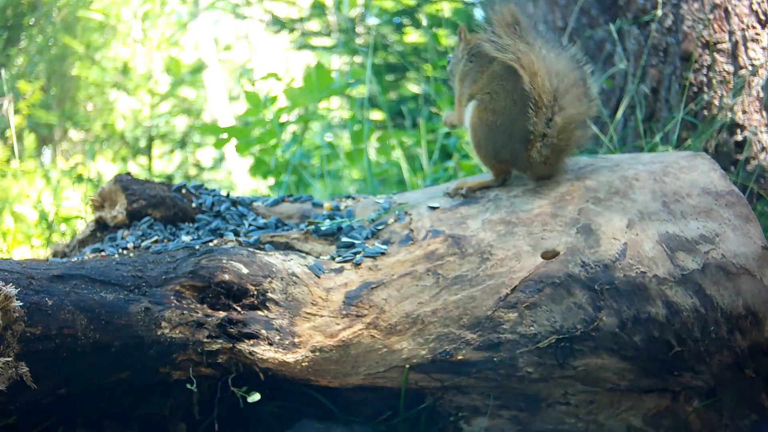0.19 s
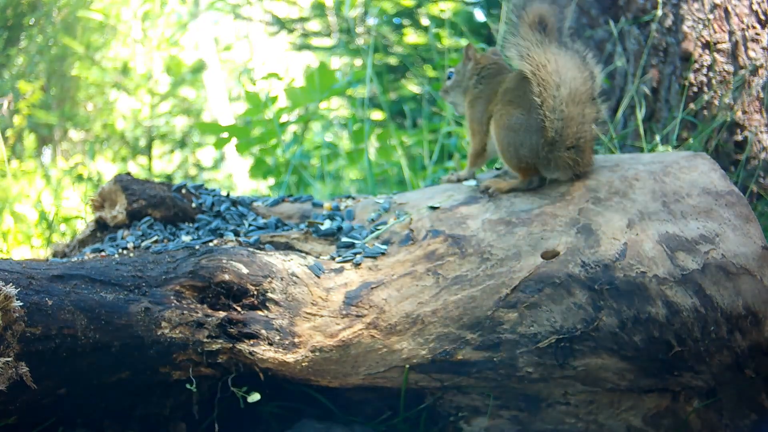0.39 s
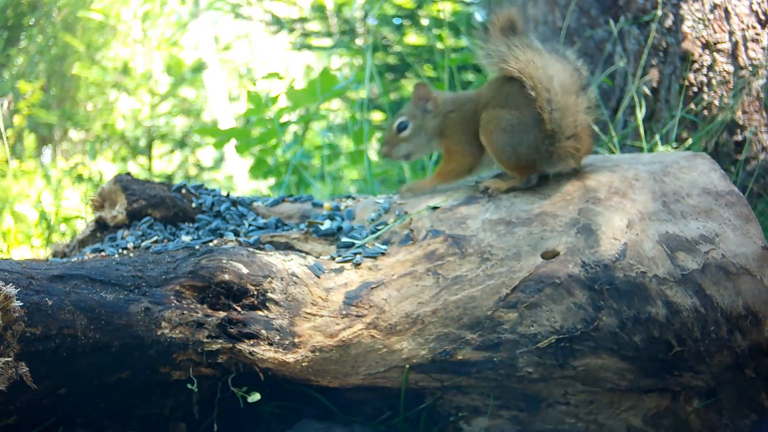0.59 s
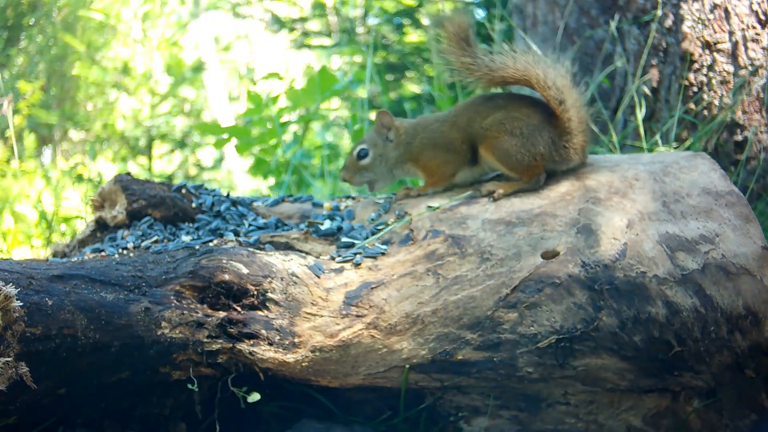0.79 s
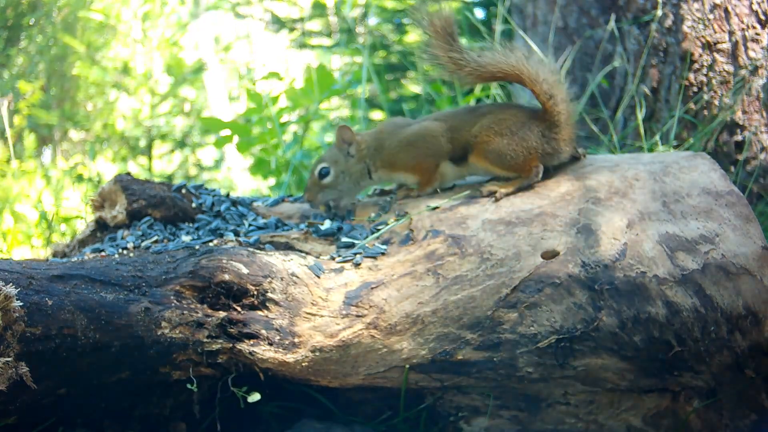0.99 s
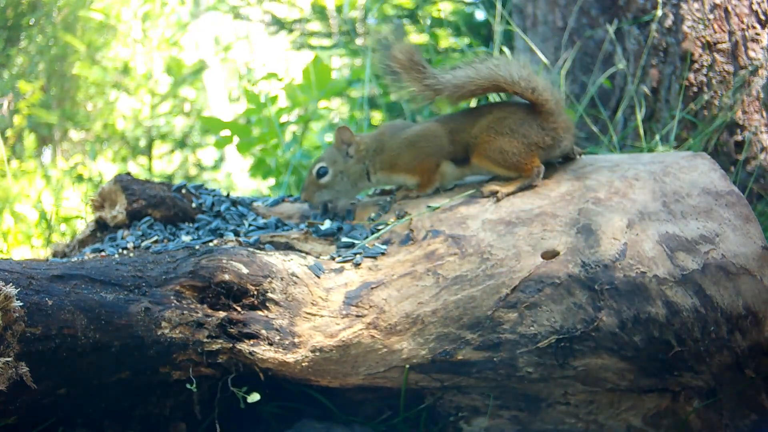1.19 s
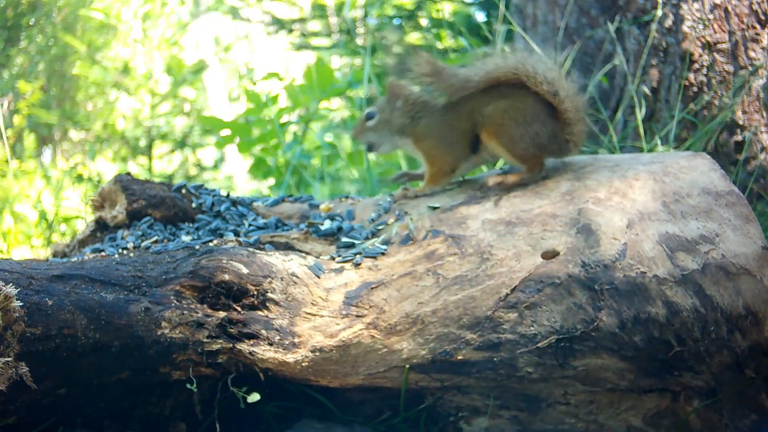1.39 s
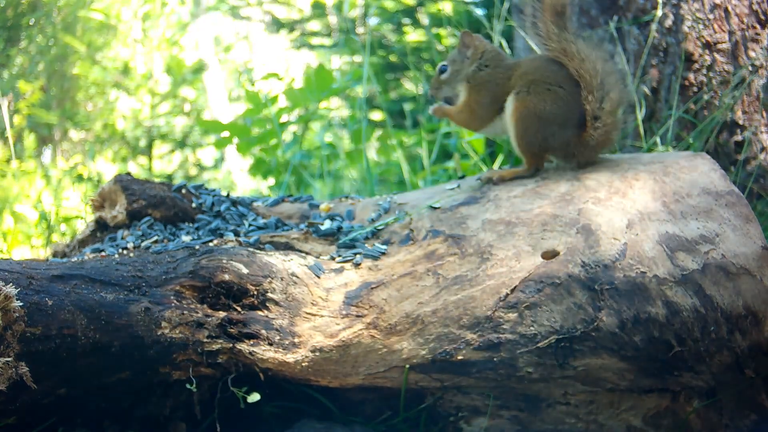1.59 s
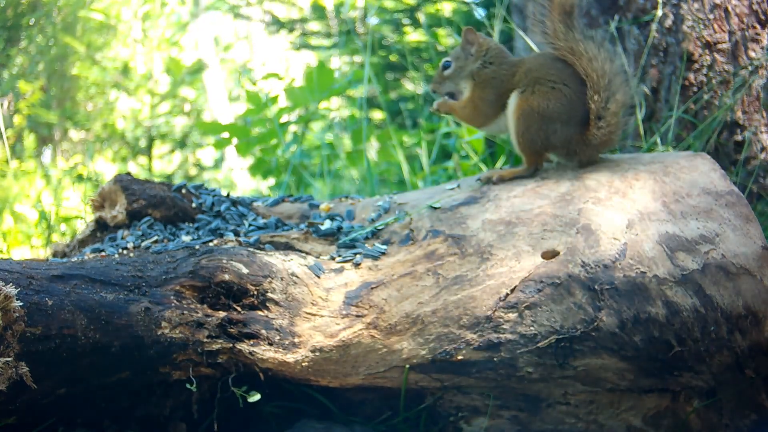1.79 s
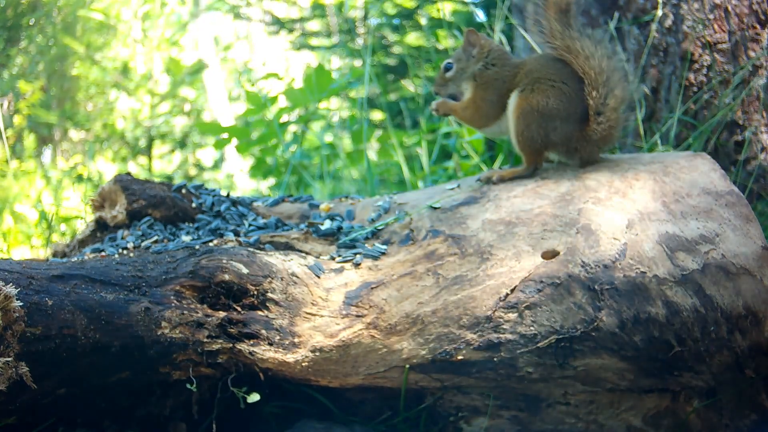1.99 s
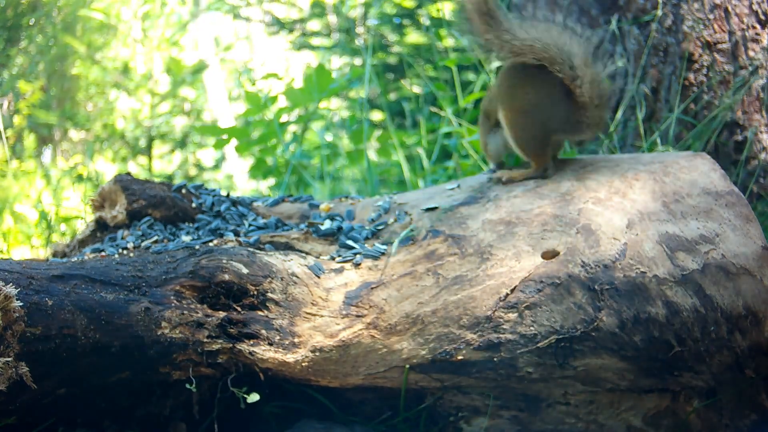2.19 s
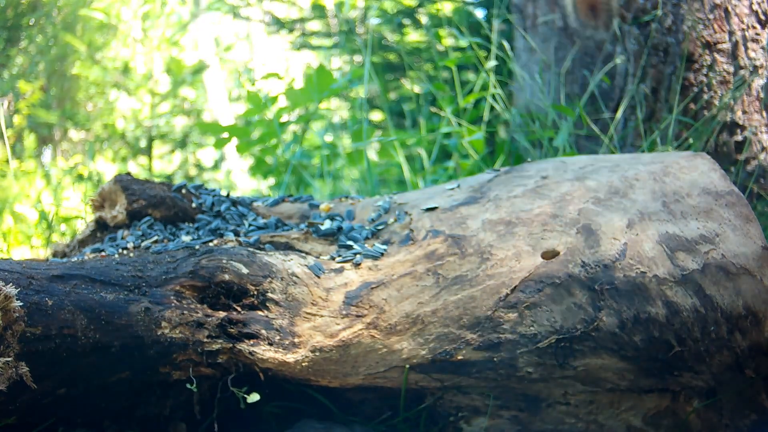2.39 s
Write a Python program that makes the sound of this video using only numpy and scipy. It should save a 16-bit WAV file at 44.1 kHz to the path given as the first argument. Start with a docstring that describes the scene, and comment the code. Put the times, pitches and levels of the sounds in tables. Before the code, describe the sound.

A crow close to the microphone gives one clear nasal caw, two harsh fluttering caws and the clipped start of a fourth; a young crow begs thinly further off, over a soft hush with slight tree echo.

```python
"""A crow close to the microphone in a wooded backyard: one clear nasal caw, two harsh fluttering ones, a fourth begun.
Each caw is a train of paired syrinx pulses and air noise, coloured by a throat with a moving resonance.
Further off a young crow begs in thin, hoarse-edged cries and a small bird chirps in gliding whistles.
A squirrel's claws scratch a log as short noise bursts, over a steady hush of air noise.
The trees return a soft echo of the birds; the loudest peaks flatten and crackle in the microphone."""
import sys
import numpy as np
from scipy import signal
from scipy.fft import rfft, irfft, next_fast_len
from scipy.io import wavfile
from scipy.ndimage import uniform_filter1d

SR = 44100
rng = np.random.default_rng(int(sys.argv[2]) if len(sys.argv) > 2 else 0)


def store_pcm(level_fs):
    """Save levels as 16-bit WAV."""
    pcm = np.round(np.clip(level_fs, -1, 1) * 32767).astype(np.int16)
    wavfile.write(sys.argv[1], SR, np.atleast_2d(pcm).T)


N = 112455
TIME = np.arange(N) / SR  # s
CUTOFF_HZ = 15800  # top of the voices and of the microphone
EDGE_S = 0.0034  # a voice starts and stops this fast


def from_db(db):
    """Decibels to gain."""
    return 10 ** (np.asarray(db) / 20)


def rms_one(x):
    """Scale to unit power."""
    return x / np.sqrt(np.mean(x ** 2) + 1e-20)


def in_time(rows):
    """Each column of a curve, interpolated at every sample."""
    time_s, *columns = np.transpose(rows)
    return [np.interp(TIME, time_s, column) for column in columns]


def gate(rows):
    """Open from a curve's first point to its last, with short sloping edges."""
    inside_s = np.minimum(TIME - rows[0][0], rows[-1][0] - TIME)
    return np.clip(inside_s / EDGE_S + .5, 0, 1)


def drift(hz):
    """Random wander of spread 1: noise lowpassed around the given rate."""
    r = np.exp(-2 * np.pi * hz / SR)
    wander = signal.lfilter([1], [1, -2 * r, r * r], rng.standard_normal(2 * N))
    return rms_one(wander[N:])  # the first half lets the filter settle


def oscillate(hz):
    """Sine following a moving frequency."""
    return np.sin(2 * np.pi * np.cumsum(hz) / SR)


def colour(x, points):
    """Causal (minimum-phase) filter through (freq_hz, gain_db) points."""
    size = 2 * next_fast_len(N)
    hz, db = np.transpose(points)
    grid_hz = np.maximum(np.arange(size // 2 + 1) * SR / size, 1)
    gain_db = np.interp(np.log(grid_hz), np.log(hz), db)
    cepstrum = irfft(np.log(from_db(gain_db)))
    # fold the cepstrum forward in time: this makes the filter minimum-phase
    cepstrum[1:size // 2] *= 2
    cepstrum[size // 2 + 1:] = 0
    return irfft(rfft(x, size) * np.exp(rfft(cepstrum)))[:N]


def highpass(x, order, hz):
    """Remove what lies below a frequency."""
    return signal.sosfilt(signal.butter(order, hz, "high", fs=SR, output="sos"), x)


def even(x):
    """Hold the level near 1, leaving the fast flutter."""
    size = SR // 50
    power = uniform_filter1d(uniform_filter1d(x * x, size), size)
    return x / np.sqrt(np.abs(power) + 1e-12)


def syrinx(pitch, active, jitter, hiss_db, centre_hz, boost_db, width_hz, second=0, limp=0, wander=0, wander_s=1):
    """One pulse a cycle, or a second one just off mid-cycle, under a moving resonance, with bright air noise."""
    phase = 2 * np.pi * np.cumsum(pitch * (1 + jitter * drift(150))) / SR
    on = uniform_filter1d(active, SR // 10) > 1e-6  # only compute around the call
    lead = np.exp(1j * (phase + np.pi * limp / 2))[on]
    lag = np.exp(1j * (phase + np.pi - np.pi * limp / 2))[on]
    pitch_on, centre_on, time_on = pitch[on], centre_hz[on], TIME[on]
    first_pulse, second_pulse, stack = 1, second, 0
    for harmonic in range(1, 64):
        first_pulse = first_pulse * lead
        second_pulse = second_pulse * lag
        hz = harmonic * pitch_on
        gain = 1 + from_db(boost_db) / (1 + 1j * (hz - centre_on) / width_hz)
        # the upper harmonics wander in level (real part) and phase (imaginary part)
        knots = rng.standard_normal(2000) + 2j * rng.standard_normal(2000)
        if harmonic > 8:
            gain = gain * np.exp(wander * np.interp(time_on / wander_s, np.arange(len(knots)), knots))
        stack = stack + ((first_pulse + second_pulse) * gain).real * (hz < CUTOFF_HZ)
    pulses = np.zeros(N)
    pulses[on] = stack
    hiss = highpass(rng.standard_normal(N), 2, 2300)
    puffs = 1 + np.cos(2 * phase if second else phase)  # air noise swells once per pulse
    return pulses + from_db(hiss_db) * hiss * puffs


def voiced(x, level_db, treble_db):
    """Give the body of a call its level, and the treble its level relative to the body."""
    body = signal.sosfiltfilt(signal.butter(6, 2450, fs=SR, output="sos"), x)
    return from_db(level_db) * (even(body) + from_db(treble_db) * even(x - body))


# Spectrum of the backyard hush: freq_hz, gain_db
AIR_SPECTRUM = [(25,-16),(90,-7),(260,-23),(480,-15),(1500,-5.5),(2400,-8),(4500,-23.5),(7100,-35.5),(15500,-50.5)]


def backyard_air():
    """Steady coloured noise, the hush of the place."""
    return from_db(-57.5) * rms_one(colour(rng.standard_normal(N), AIR_SPECTRUM))


# Colour of the echo from the trees: freq_hz, gain_db
ECHO_SPECTRUM = [(200,-9.5),(1500,-3),(4000,7),(15000,-6.5)]
ECHO_DB, ECHO_T60_S, ECHO_RISE_S = -18, 0.45, 0.013


def trees(x):
    """Diffuse echo from trunks and leaves: a decaying noise tail."""
    decay = from_db(-60 * TIME / ECHO_T60_S) * np.clip(TIME / ECHO_RISE_S, 0, 1)
    tail = rng.standard_normal(N) * decay
    echo = signal.fftconvolve(x, tail / np.linalg.norm(tail))[:N]
    return from_db(ECHO_DB) * colour(echo, ECHO_SPECTRUM)


# Claw strokes on the log: start_s, level_db (before the bark colours them)
CLAW_STROKES = [(2.477,-53),(2.488,-61),(2.5137,-53),(2.527,-50.5)]
# Colour of a scratch on bark: freq_hz, gain_db
BARK_SPECTRUM = [(300,-22),(2200,23),(4200,12.5),(6000,4),(15000,-7.5)]
CLAW_DECAY_S = 0.0028


def squirrel_claws():
    """Tiny scratches as the squirrel darts off: noise bursts that start at once and die away."""
    bursts = np.zeros(N)
    for start_s, level_db in CLAW_STROKES:
        bursts += from_db(level_db) * (TIME >= start_s) * np.exp(-np.abs(TIME - start_s) / CLAW_DECAY_S)
    return colour(bursts * rng.standard_normal(N), BARK_SPECTRUM)


# Small bird's whistles: start_s, length_s, start_hz, end_hz, level_db (peak)
BIRD_CHIRPS = [(2.452,.045,5200,3470,-60),(2.467,0.015,3000,4280,-64),(2.49,0.021,2590,2980,-51)]


def small_bird():
    """Short pure whistles that glide in pitch, swelling and fading."""
    out = np.zeros(N)
    for start_s, length_s, start_hz, end_hz, level_db in BIRD_CHIRPS:
        progress = np.clip((TIME - start_s) / length_s, 0, 1)
        whistle = oscillate(start_hz + (end_hz - start_hz) * progress)
        out += from_db(level_db) * np.sin(np.pi * progress) * whistle
    return out


# Young crow's begging cries, one curve each: time_s, pitch_hz, level_db, resonance_hz
BEG_CRIES = [
    [(.76,713,-71,1580),(.88,707,-47,1700),(.93,640,-48,2030),(.97,653,-64,1930)],
    [(.97,671,-48,1530),(1.005,689,-38.5,1400),(1.025,718.6,-32.5,1450),(1.047,696.5,-32,1410),(1.065,705,-36,1450)],
    [(2.3,708,-41.5,1430),(2.36,740,-55,1430),(2.43,730,-70,1400)],
]
# Young crow's throat as heard from further off: freq_hz, gain_db
YOUNG_THROAT = [(400,-28.5),(700,-14),(1450,-0.5),(2100,-5.5),(2900,-21.5),(3600,-10.5),(4500,-21.5),(5600,-22),(8000,-32),(15000,-63)]
HOARSE_EXTRA, HOARSE_S = 4.4, 0.018  # added jitter at the start, in multiples; how fast it clears


def begging_cry(rows):
    """A thin, high cry from further off, its pitch jittering most at the start."""
    pitch, level_db, centre_hz = in_time(rows)
    hoarse = 1 + HOARSE_EXTRA * np.exp(-np.abs(TIME - rows[0][0]) / HOARSE_S)
    source = syrinx(pitch, gate(rows), jitter=0.019 * hoarse, hiss_db=-11.0,
                    centre_hz=centre_hz, boost_db=21.5, width_hz=140)
    return gate(rows) * from_db(level_db) * even(colour(source, YOUNG_THROAT))


# Near crow's throat, shared by its openers and all its caws: freq_hz, gain_db
CROW_THROAT = [(280,-40.5),(450,-14.5),(620,-13),(750,-9.5),(950,-6.5),(1270,-0.5),(1450,1),(1700,3.5),(1900,-8),(2130,-7),(2350,-21),(2750,-18),(3020,-17.5),(3230,-11.5),(3850,-28.5),(4450,-21),(5200,-27),(5650,-34.5),(6700,-33),(7500,-40),(8500,-42),(9600,-58),(10800,-56.5),(15000,-65)]
# Lone syrinx pulses opening the first three caws: start_s, level_db (before the throat)
OPENING_PULSES = [(0.2138,5),(1.0606,8.5),(1.851,2.5)]


def openers():
    """Single pulses of the syrinx ring in the throat."""
    pulses = np.zeros(N)
    for start_s, level_db in OPENING_PULSES:
        pulses[int(start_s * SR)] = from_db(level_db)
    return colour(pulses, CROW_THROAT)


SECOND_PULSE = 0.77  # strength of the second pulse in each cycle, relative to the first

# Harsh caws, one curve each: time_s, pitch_hz, limp (second pulse off mid-cycle, in half cycles)
HARSH_PITCHES = [
    [(1.06,216.1,0.038),(1.085,254.8,0.086),(1.11,305.6,0.085),(1.14,314.6,0.077),(1.2,290,0.04),(1.25,278.6,.022),(1.31,272.2,0.048),(1.4,249.1,0.017),(1.5,233.7,0.03),(1.6,219.2,0.04),(1.655,169,0.097)],
    [(1.859,216.9,0.043),(1.88,267.9,0.065),(1.92,315.1,0.017),(1.945,317.8,0.031),(2.0,296.2,0.06),(2.1,278.9,0.095),(2.2,245.9,0.059),(2.26,223,0.075),(2.305,177,0.082)],
    [(2.543,211,0.075),(2.56,249,0.095)],
]
# Harsh caws, one curve each: time_s, level_db, resonance_hz, treble_db (relative to level)
HARSH_SHAPES = [
    [(1.064,-31,1420,-13.5),(1.073,-26.5,1390,-18),(1.082,-15,1420,-17.5),(1.14,-16.5,1365,-15),(1.21,-16.5,1720,-18.5),(1.32,-15,1596,-17.5),(1.40,-19,1700,-18.5),(1.52,-19.5,1420,-17.5),(1.615,-21,1345,-17),(1.65,-30.5,1450,-19)],
    [(1.86,-22.5,1275,-18.5),(1.88,-15.5,1540,-17.5),(1.94,-16,1450,-16.5),(2.03,-14.5,1710,-19),(2.11,-15.5,1600,-17.5),(2.16,-17.5,1570,-19),(2.265,-20.5,1400,-18),(2.302,-32,1370,-19)],
    [(2.544,-25,1400,-15),(2.56,-47,1400,-22)],
]
# the flutter follows the pitch, so it slows as the pitch sags
FLUTTER_PER_CYCLE, FLUTTER_UNREST = .215, .045  # unrest: random spread of its rate, as a fraction
FLUTTER_DEPTH, FLUTTER_DB = 0.057, 1.5  # pitch swing as a fraction; level swing
FLUTTER_FULL_DB, FLUTTER_FOLLOWS = -17, 1.17  # below this level it shrinks: dB of flutter per dB
CATCH_AT_S, CATCH_S, CATCH_DB = 1.9255, 0.0021, -8.5  # the voice catches briefly in the third caw


def harsh_caw(pitch_rows, shape_rows):
    """Pulse pairs limp unsteadily; at full effort the pitch flutters about sixty times a second."""
    pitch, limp = in_time(pitch_rows)
    level_db, centre_hz, treble_db = in_time(shape_rows)
    active = gate(shape_rows)
    effort = from_db(FLUTTER_FOLLOWS * np.minimum(level_db - FLUTTER_FULL_DB, 0))
    flutter_hz = FLUTTER_PER_CYCLE * pitch * (1 + FLUTTER_UNREST * drift(40)) * active
    flutter = effort * oscillate(flutter_hz)
    # the fast wander of the upper harmonics is heard as a rasp
    source = syrinx(pitch * (1 + FLUTTER_DEPTH * flutter), active, jitter=.009 * (2 - effort), hiss_db=0,
                    centre_hz=centre_hz, boost_db=4.5, width_hz=163, second=SECOND_PULSE,
                    limp=limp + .015 * drift(140), wander=.28, wander_s=.003)
    throaty = colour(source * from_db(FLUTTER_DB * flutter), CROW_THROAT)
    catch_db = CATCH_DB * np.exp(-((TIME - CATCH_AT_S) / CATCH_S) ** 2)
    return active * voiced(throaty, level_db + catch_db, treble_db)


# Clear caw's pitch: time_s, pitch_hz
CLEAR_PITCH_CURVE = [(.218,224),(.235,284.6),(.25,323.8),(.29,335.4),(.35,329.4),(.387,320.6),(.427,311.1),(.5,312.2),(.569,290.3),(.611,277.9),(.671,268.1),(.71,248.5),(.75,212.1)]
# Clear caw's loudness and throat: time_s, level_db, resonance_hz, treble_db (relative to level)
CLEAR_SHAPE_CURVE = [(.219,-30,1200,-13.5),(.234,-18,1370,-16.5),(.265,-16,1320,-14.5),(.31,-14,1303,-17),(.38,-18,1430,-13),(.41,-19,1350,-11.5),(.54,-19,1407,-14),(.575,-19,1656,-11.5),(.62,-17,1605,-19.5),(.665,-17.5,1670,-13.5),(.69,-22.5,1610,-13),(.725,-23.5,1514,-16.5),(.748,-35.5,1460,-29)]
# How unevenly its pulses pair up: time_s, limp (second pulse off mid-cycle, in half cycles)
CLEAR_LIMP_CURVE = [(.23,0.12),(.38,.119),(.5,0.13),(.56,0.087),(.6,0.11),(.64,0.032),(.67,0.0058),(.71,0.04)]
# Its fundamental, heard only in the first part of the caw: time_s, level_db (peak)
FUNDAMENTAL_CURVE = [(.235,-66),(.26,-37),(.37,-32.5),(.405,-36.5),(.435,-62)]
# Extra brightness of the clear caw: freq_hz, gain_db
CLEAR_BRIGHTNESS = [(900,1),(2000,0.5),(3200,0),(10000,2.5)]


def clear_caw():
    """Steady pulse pairs even out towards the end, in a throat whose resonance moves with the beak."""
    pitch, = in_time(CLEAR_PITCH_CURVE)
    level_db, centre_hz, treble_db = in_time(CLEAR_SHAPE_CURVE)
    limp, = in_time(CLEAR_LIMP_CURVE)
    fundamental_db, = in_time(FUNDAMENTAL_CURVE)
    active = gate(CLEAR_SHAPE_CURVE)
    # the upper harmonics swell and fade a little, more slowly than in the harsh caws
    source = syrinx(pitch, active, jitter=.003, hiss_db=-3, centre_hz=centre_hz, boost_db=6, width_hz=42,
                    second=SECOND_PULSE, limp=limp, wander=.2, wander_s=0.0299)
    fundamental = gate(FUNDAMENTAL_CURVE) * from_db(fundamental_db) * oscillate(pitch)
    overtones = highpass(source, 6, 400)
    throaty = colour(colour(overtones, CROW_THROAT), CLEAR_BRIGHTNESS)
    return active * (voiced(throaty, level_db, treble_db) + fundamental)


def scene():
    """The near crow and the far birds with their echo, the squirrel and the hush."""
    harsh = sum(harsh_caw(pitch, shape) for pitch, shape in zip(HARSH_PITCHES, HARSH_SHAPES))
    near = clear_caw() + openers() + harsh
    far = sum(begging_cry(rows) for rows in BEG_CRIES) + small_bird()
    echo = trees(near + from_db(18) * far)  # far birds have more echo for their direct sound
    return (near + far + echo + squirrel_claws() + backyard_air())[None]


# Colour of the crackle on overloaded peaks: freq_hz, gain_db
CRACKLE_SPECTRUM = [(100,16),(400,17.5),(6000,-22),(15000,-33)]
OVERLOAD, CRACKLE_DB = 0.22, -19.5  # peak height where the crackle starts; its strength
MIC_TOP = .42  # the microphone flattens peaks near this height


def record(dry):
    """Peaks overload the microphone, flatten and crackle; the top is cut."""
    excess = np.maximum(np.abs(dry[0]) - OVERLOAD, 0)
    crackle = from_db(CRACKLE_DB) * colour(excess * rng.standard_normal(N), CRACKLE_SPECTRUM)
    flattened = dry / (1 + (dry / MIC_TOP) ** 12) ** (1 / 12)
    top_cut = signal.ellip(10, .1, 80, CUTOFF_HZ, fs=SR, output="sos")
    return signal.sosfilt(top_cut, flattened + crackle)


dry = scene()
out = record(dry)
store_pcm(out)
```